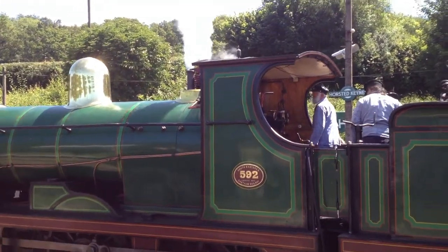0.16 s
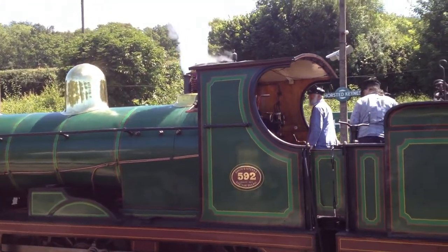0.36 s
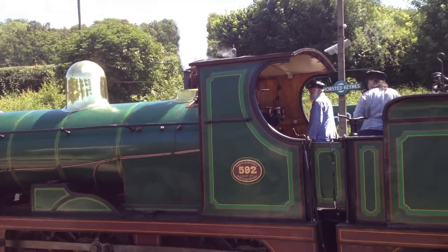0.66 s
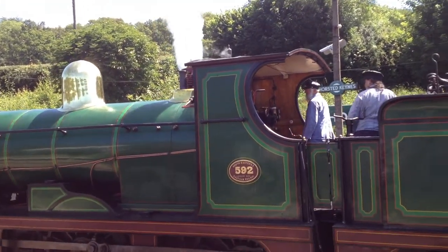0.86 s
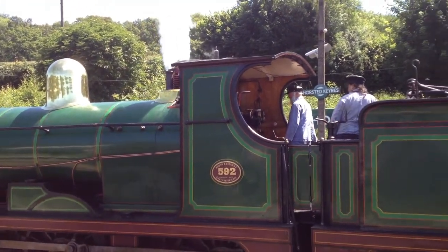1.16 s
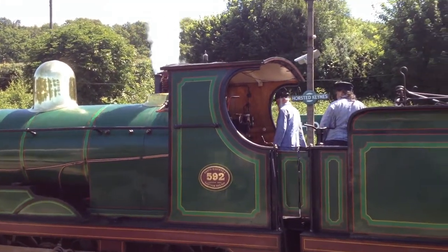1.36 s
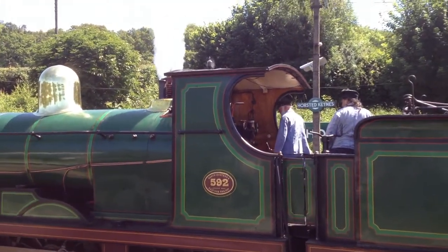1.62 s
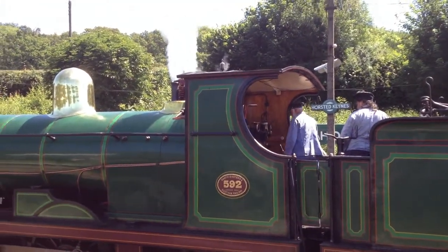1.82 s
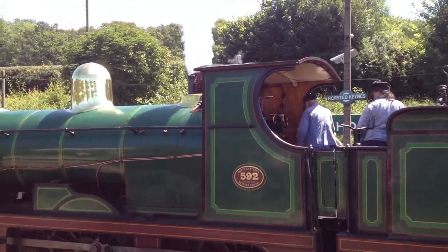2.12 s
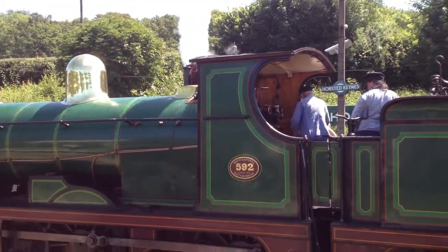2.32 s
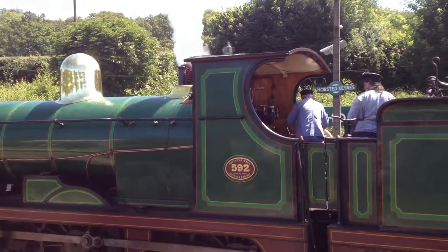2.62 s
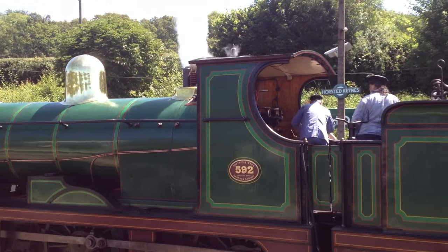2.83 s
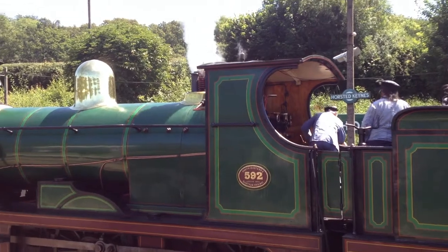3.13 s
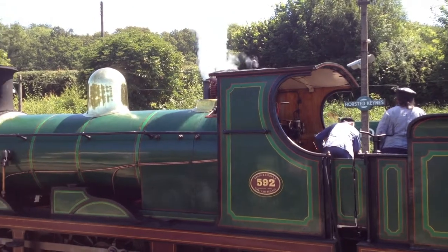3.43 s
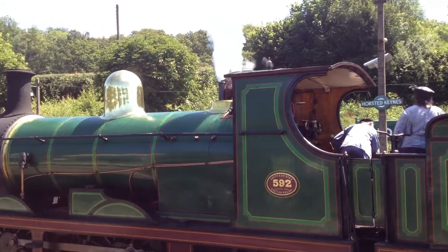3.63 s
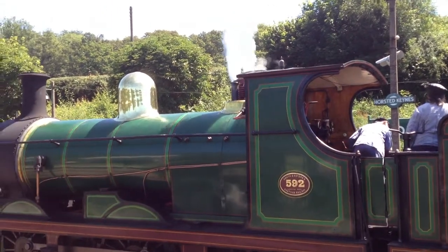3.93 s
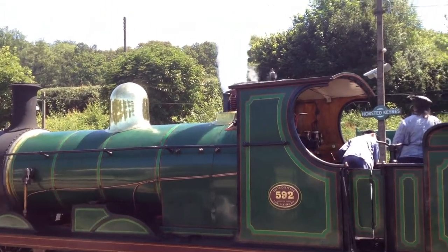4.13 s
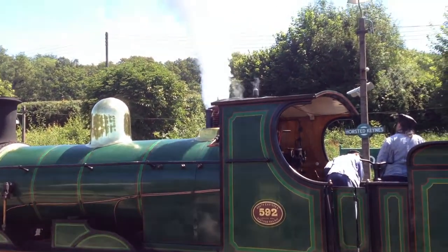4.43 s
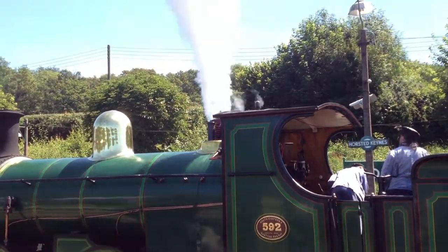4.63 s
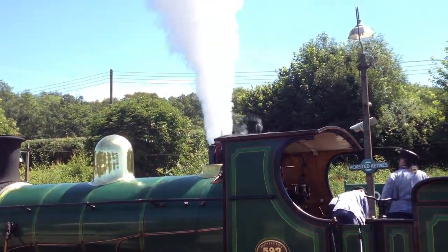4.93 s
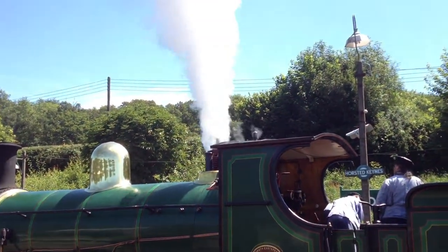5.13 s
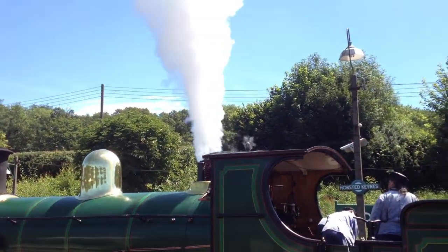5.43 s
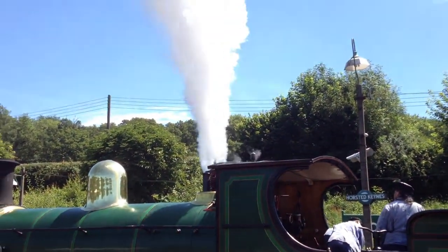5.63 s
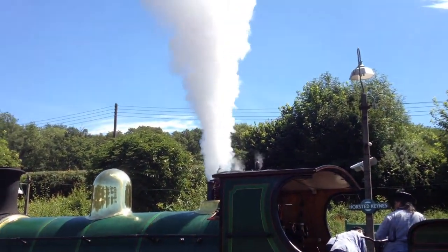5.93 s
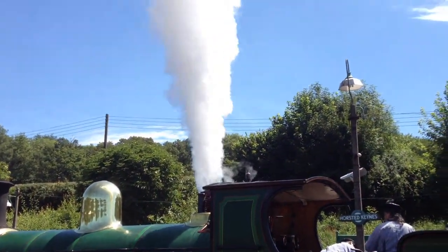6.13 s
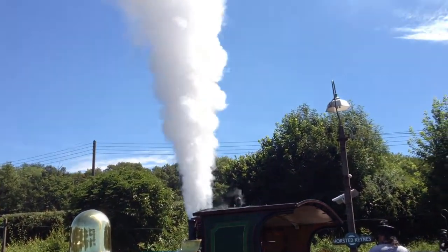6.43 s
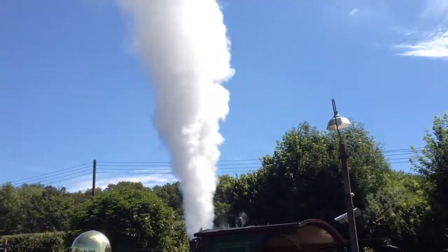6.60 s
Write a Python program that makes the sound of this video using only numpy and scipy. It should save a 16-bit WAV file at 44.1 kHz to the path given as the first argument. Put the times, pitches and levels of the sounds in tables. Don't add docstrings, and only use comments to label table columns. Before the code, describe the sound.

A stationary steam locomotive vents through its safety valves about ten metres away outdoors. The loud, broadband hiss is already at full force and never stops, swelling in small quick gusts. Its tone glides during the first second, from hollow and roaring to clearer and brighter, as the handheld phone is raised. Very faint low finger bumps hide beneath it. The sound is practically mono, slightly crunchy.

```python
import sys
import numpy as np
from scipy import signal
from scipy.fft import rfft, irfft, next_fast_len
from scipy.io import wavfile
from scipy.ndimage import uniform_filter1d, map_coordinates

SR = 44100
rng = np.random.default_rng(int(sys.argv[2]) if len(sys.argv) > 2 else 0)


def materialize(psi):
    bounded = np.clip(np.atleast_2d(psi).T, -1, 1)
    quanta = np.round(bounded * 32767).astype(np.int16)
    wavfile.write(sys.argv[1], SR, quanta)


def amplitude_ratio(level_db):
    exponent = np.asarray(level_db, float) / 20
    return 10 ** exponent


N = 298116
HOP = 128
FRAME = 1024
TOP_HZ = 15290

# (time [s], lag [ms])
PLATFORM_LAG = [(0, 3.21), (.1, 3.165), (.3, 2.8), (.8, 2.06), (.92, 1.992), (1.07, 1.955), (1.25, 1.977),
                (1.77, 2.093), (2.12, 2.045), (2.57, 2.074), (3.1, 2.016), (3.8, 1.948), (4.0, 1.955),
                (4.4, 2.026), (5.08, 2.011), (5.72, 2.086), (6.15, 2.022), (6.76, 1.975)]
# (time [s], hand cupped round the port [1 = usual], port facing the jet [1 = usual])
GRIP = [
    (0, 1.36, 0.37),
    (.7, .85, 0.87),
    (1.3, 1, 1.2),
    (2.3, 0.93, 1.8),
    (3.5, 1.2, 1.34),
    (4.2, 1.25, 1.43),
    (4.7, 1, 1.1),
    (5.5, 1.28, 1),
    (6.2, 0.93, 0.71),
]


def unit(x):
    return x / np.sqrt(np.mean(x ** 2))


def curves(table):
    s, *columns = np.transpose(table)
    return [np.interp(np.arange(N) / SR, s, c) for c in columns]


def between(pair, share):
    raised, low = pair
    return raised + (low - raised) * share


def walk(rate, count):
    k = int(SR / HOP / rate)
    levels = rng.standard_normal((count, N // HOP))[:, :N // HOP // k + 2]
    held = np.repeat(levels, k, axis=1)
    slewed = uniform_filter1d(uniform_filter1d(held, k), k)
    return unit(slewed - uniform_filter1d(slewed, 5 * k))


def late(x, lag_ms, order):
    return map_coordinates(x, [np.arange(N) - lag_ms * SR / 1000], order=order, mode="mirror")


def spread(rows, where, places):
    at = np.interp(where, places, np.arange(len(places)))
    below = np.minimum(at.astype(int), len(places) - 2)
    share = (at - below)[:, None]
    return (1 - share) * rows[below] + share * rows[below + 1]


def dull(x, hz):
    return signal.sosfiltfilt(signal.butter(1, min(hz, .45 * SR), fs=SR, output="sos"), x)


def lowered():
    raised_ms, lowered_ms = 2.0, 3.2
    return np.clip((curves(PLATFORM_LAG)[0] - raised_ms) / (lowered_ms - raised_ms), 0, 1)


def handling():
    # (time [s], level [dB])
    thud_table = [
        (.31, -71),
        (.42, -75),
        (2.44, -76),
        (2.54, -78.5),
        (4.67, -74.5),
        (5.25, -70),
        (5.65, -76),
        (5.8, -70),
        (6.37, -71.5),
        (6.532, -76),
    ]
    thud_s, reach = 0.038, 4096
    out = np.zeros(N)
    t = np.arange(-reach, reach) / SR / thud_s
    for s, db in thud_table:
        middle = int(s * SR)
        out[middle - reach:middle + reach] += amplitude_ratio(db) * t * np.exp(-t ** 2)
    return out


def surges(hz, s):
    # (time [s], level [dB], brightness [dB per octave], length [s])
    gust_table = [(0.28, 0.3, 0.1, 0.14), (0.644, 1.5, .8, 0.12), (0.956, 2.5, 0.1, 0.064),
                  (1.141, 1.5, 1.25, 0.065), (1.51, 1, 0.1, .06), (1.795, 0.3, 0.74, 0.075),
                  (2.154, 0.2, 0.2, 0.12), (2.548, 2, 0.26, 0.077), (2.874, 1, -0.6, 0.029),
                  (3.042, 1.6, 0.7, 0.043), (3.433, 2.5, -.1, 0.079), (3.982, 1.4, -0.5, 0.067),
                  (4.315, 1.5, -0.1, 0.027), (4.687, 1.1, 0.33, 0.12), (5.29, 1.5, -0.27, 0.17),
                  (5.704, 1.65, 0.2, 0.11), (6.038, 0.4, 0, 0.066), (6.308, 1.8, -0.94, 0.15),
                  (6.705, 1.7, -0.3, 0.047)]
    pivot_hz, floor_hz = 4800, 900
    at, db, tilt, length = np.transpose(gust_table)[:, :, None]
    swell = np.exp(-.5 * ((s - at) / length) ** 2)
    octaves = np.log2(np.clip(hz, floor_hz, None) / pivot_hz)[:, None]
    return (db * swell).sum(axis=0) + octaves * (tilt * swell).sum(axis=0)


def jet():
    # (frequency [Hz], density [dB per Hz])
    jet_colour = [(20, -70), (45, -68), (95, -49), (140, -22), (260, -18), (480, -14), (800, -7.5),
                  (1200, -6), (2200, -5), (4000, -5), (6000, -5), (9000, -2.5), (13200, -3), (14300, -6)]
    shared_db, patch_db, flicker_db = .3, .4, .55
    size = next_fast_len(N, True)
    colour_hz, colour_db = np.transpose(jet_colour)
    log_hz = np.log(np.fft.rfftfreq(size, 1 / SR) + 1)
    colour = amplitude_ratio(np.interp(log_hz, np.log(colour_hz), colour_db))
    noise = irfft(colour * rfft(rng.standard_normal(size)), size)[:N]

    hz, s, cells = signal.stft(noise, SR, nperseg=4 * HOP, noverlap=3 * HOP)
    octave = np.log2(np.clip(hz, 100, None) / 100)
    patches = spread(walk(34, count=9)[:, :len(s)], octave, np.arange(9))
    slices = spread(walk(24, count=25)[:, :len(s)], 3 * octave, np.arange(25))
    shared = walk(44, count=1)[:, :len(s)]
    eddy_db = shared_db * shared + patch_db * patches + flicker_db * slices
    reach = np.clip(hz / 1400.0, 0, 1)[:, None]
    shaken = cells * amplitude_ratio(surges(hz, s) + reach * eddy_db)
    return unit(signal.istft(shaken, SR, nperseg=4 * HOP, noverlap=3 * HOP)[1][:N])


def near_bounces(x):
    sway = [np.interp(np.arange(N), np.arange(len(w)) * HOP, w) for w in walk(2, count=2)]
    turned = curves(GRIP)[1] - 1
    sky = np.interp(np.arange(N) / SR, (5.8, 6.15), [0, 1])
    total = 0
    # (gain, lag [ms], lag change facing the jet [ms], lag change tipped up [ms])
    surfaces = [(0.13, .7, 0.008, -0.15), (0.14, 1.32, -.1, .14)]
    for (gain, ms, turn_ms, tip_ms), w in zip(surfaces, sway):
        lag_ms = ms + .03 * w + turn_ms * turned + tip_ms * sky
        total = total + gain * late(x, lag_ms, order=1)
    return (1 + 0.35 * sky) * total


def bounces(x):
    # (lag [ms], gain)
    far_table = [(2.95, .13), (3.75, .05), (4.75, .05)]
    low_gain, treble_gain = (.43, .6), (.32, 0.051)
    near_share, far_share = (1, .4), (1.02, 1.8)
    hiss_db, roar_db = (-0.26, 2), (0.66, 3.5)
    low_rise, treble_fade, body_rise = 0.55, .25, .3

    low = lowered()
    near = near_bounces(x)
    far = sum(g * late(x, ms, order=1) for ms, g in far_table)
    body = .25 * np.clip(low / body_rise, 0, 1) * late(x, 1.4, order=1)
    others = dull(between(near_share, low) * near + between(far_share, low) * far + body, 5680)

    ground = late(x, curves(PLATFORM_LAG)[0], order=3)
    lows = dull(ground, 3300)
    bass_bounce = between(low_gain, np.clip(low / low_rise, 0, 1)) * lows
    treble_bounce = between(treble_gain, np.clip(low / treble_fade, 0, 1)) * (ground - lows)
    heard = x + bass_bounce + treble_bounce + others
    heard = heard + (amplitude_ratio(between(hiss_db, low)) - 1) * (heard - dull(heard, 6000))
    return heard + (amplitude_ratio(between(roar_db, low)) - 1) * dull(heard, 686)


def scene():
    mono = bounces(jet()) * amplitude_ratio(-14.5) + amplitude_ratio(18) * handling()
    return np.tile(mono, (2, 1))


def port(mono):
    # (frequency [Hz], width [Hz], share added [negative = notch])
    port_table = [
        (4576, 560, .8),
        (4793, 210, .4),
        (5150, 300, -.6),
        (7000, 1000, .35),
        (1558, 670, .3),
        (9790, 1100, -.2),
        (320, 70, .8),
        (160.6, 130, 0.63),
    ]
    cup, facing = curves(GRIP)
    low = lowered()
    notch_grip = cup * (1 - .45 * np.sqrt(low))
    grip = [cup, cup ** 2 * (1 - low), notch_grip, facing, facing, facing, 0.27 + low, 1]
    for held, (hz, width, share) in zip(grip, port_table):
        mono = mono + held * share * signal.lfilter(*signal.iirpeak(hz, hz / width, fs=SR), mono)
    return mono


def phone_rounding(mono):
    # (frequency [Hz], step [dB])
    step_table = [(40, -55), (100, -40), (150, -22), (500, -14), (1000, -6), (1600, -3), (3400, -2),
                  (4600, 2.5), (9000, 3.5), (15300, 5)]
    n = np.arange(2 * FRAME)[:, None] + .5
    line = np.arange(int(TOP_HZ * 2 * FRAME / SR)) + .5
    window = np.sin(np.pi * n / (2 * FRAME))
    basis = window * np.cos(np.pi / FRAME * (n + FRAME / 2) * line) * np.sqrt(2 / FRAME)
    lead = FRAME - 214
    hops = np.pad(mono, (lead, 2 * FRAME - (N + lead) % FRAME), "reflect").reshape(-1, FRAME)
    lines = np.hstack([hops[:-1], hops[1:]]) @ basis

    treble = np.sqrt(np.mean(lines[:, FRAME // 4:] ** 2, axis=1, keepdims=True))
    step_hz, step_db = np.transpose(step_table)
    line_hz = line * SR / (2 * FRAME)
    step = treble * amplitude_ratio(np.interp(np.log(line_hz), np.log(step_hz), step_db))
    whole = np.floor(np.abs(lines / step) ** .75 + .4054)
    blur = .08 * rng.standard_normal(lines.shape)
    frames = (step * (np.sign(lines) * whole ** (4 / 3) + blur)) @ basis.T
    out = np.zeros_like(hops)
    out[:-1] += frames[:, :FRAME]
    out[1:] += frames[:, FRAME:]
    return out.ravel()[lead:lead + N]


def side_noise(mono):
    # (frame [count], low edge [Hz], high edge [Hz])
    side_table = [(4, 4200, 5200), (45, 4200, 5700), (91, 7600, 8950), (102, 9650, 11000),
                  (157, 6250, 7600), (190, 4600, 5700), (200, 7550, 9650), (222, 4600, 6250),
                  (222, 8950, 11700), (248, 13750, 15150), (265, 4200, 5200), (265, 10300, 11700),
                  (269, 4600, 5700), (269, 11700, 13100), (271, 5700, 7600), (290, 11700, 13100)]
    side = np.zeros(N + FRAME)
    hz = np.fft.rfftfreq(2 * FRAME, 1 / SR)
    window = np.hanning(2 * FRAME)
    for frame, lo, hi in side_table:
        start = int(frame - 1) * FRAME + 86
        other = rfft(mono[::-1].take(np.arange(start, start + 2 * FRAME), mode="wrap"))
        side[start:start + 2 * FRAME] += window * irfft(other * (hz > lo) * (hz < hi))
    return amplitude_ratio(-1.0) * side[:N]


def roll_off(x):
    return signal.sosfilt(signal.butter(12, 16150, fs=SR, output="sos"), x)


def record(dry):
    ceiling = .82
    mono = phone_rounding(np.clip(port(dry[0]), -ceiling, ceiling))
    band_limit = signal.ellip(12, .1, 45, TOP_HZ + 20, fs=SR, output="sos")
    mono = signal.sosfiltfilt(band_limit, mono)
    side = side_noise(mono)
    return roll_off(np.array([mono + side, mono - side]))


dry = scene()
out = record(dry)
materialize(out)
```